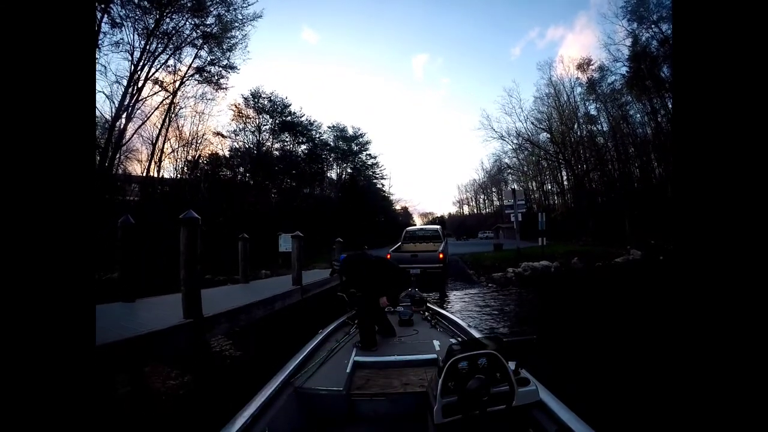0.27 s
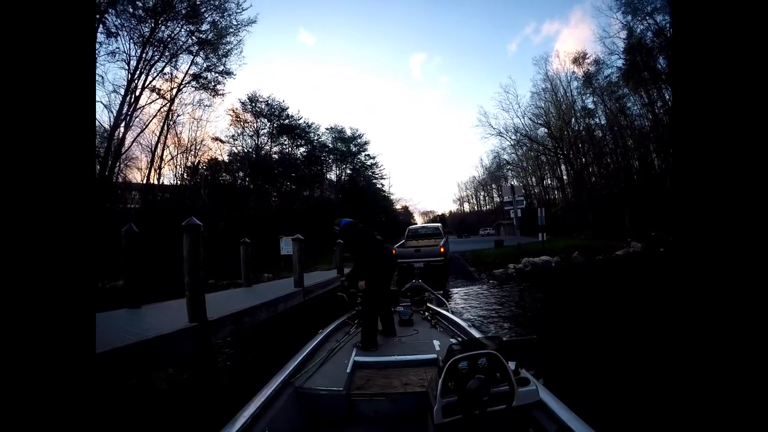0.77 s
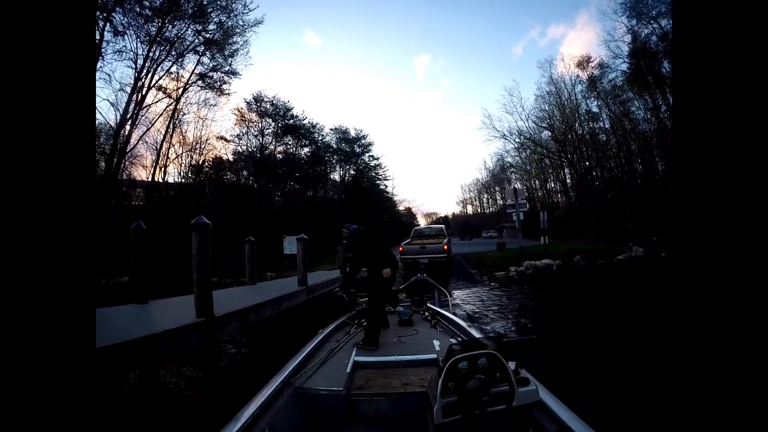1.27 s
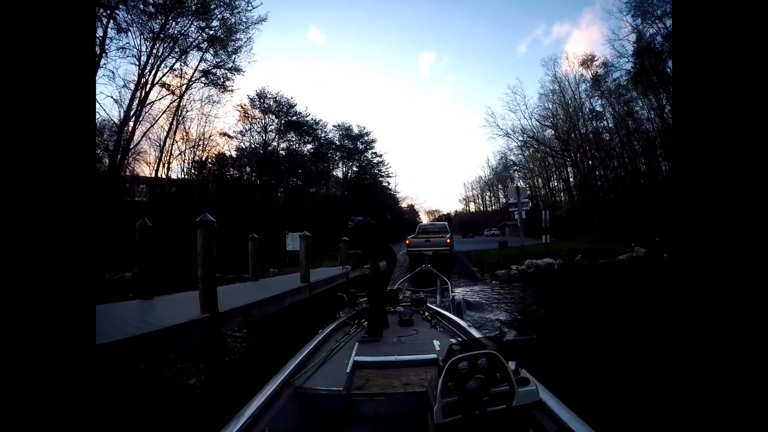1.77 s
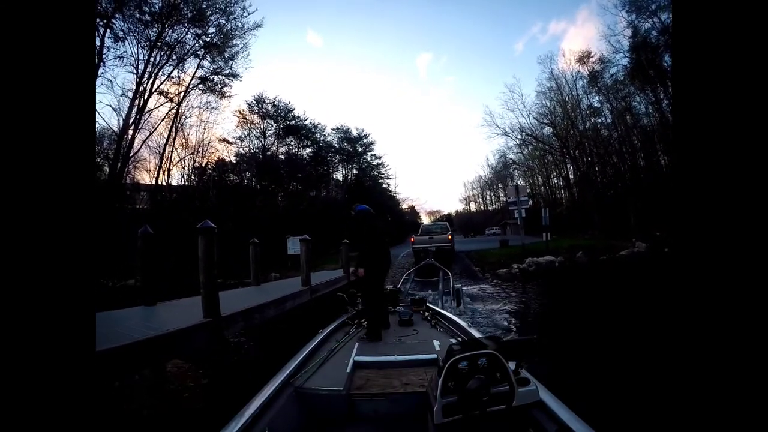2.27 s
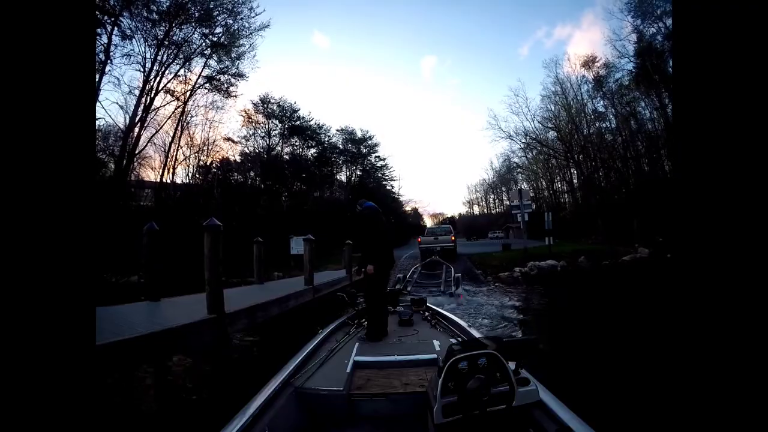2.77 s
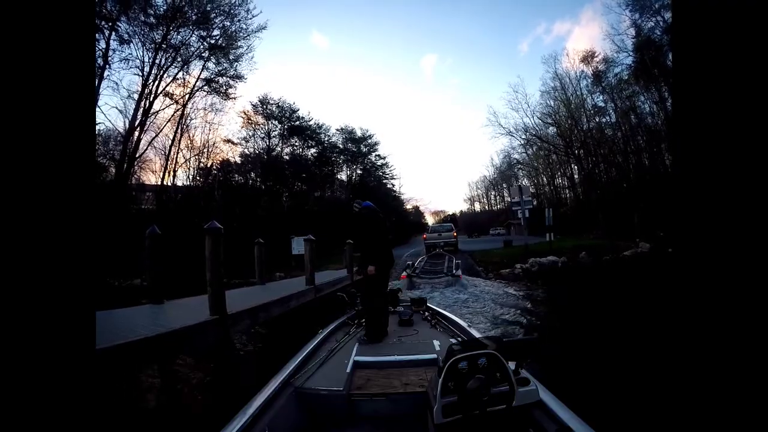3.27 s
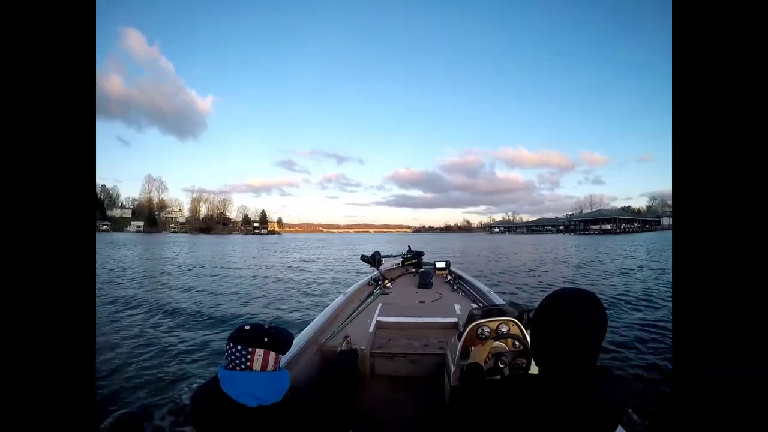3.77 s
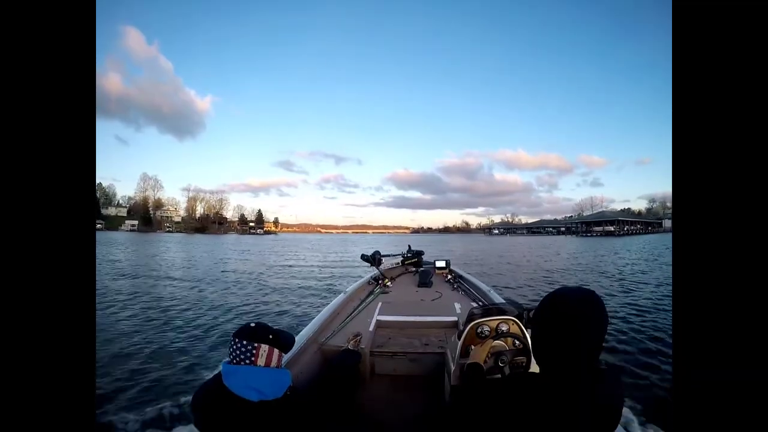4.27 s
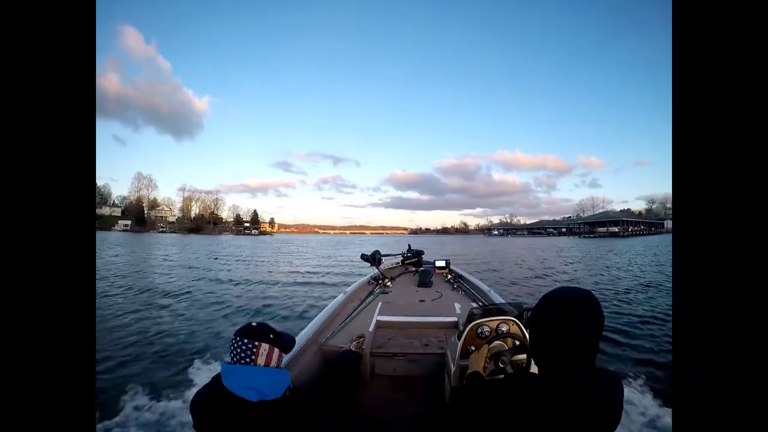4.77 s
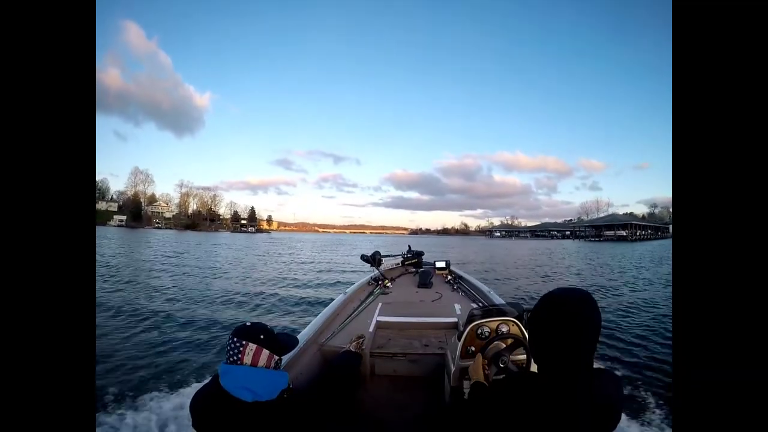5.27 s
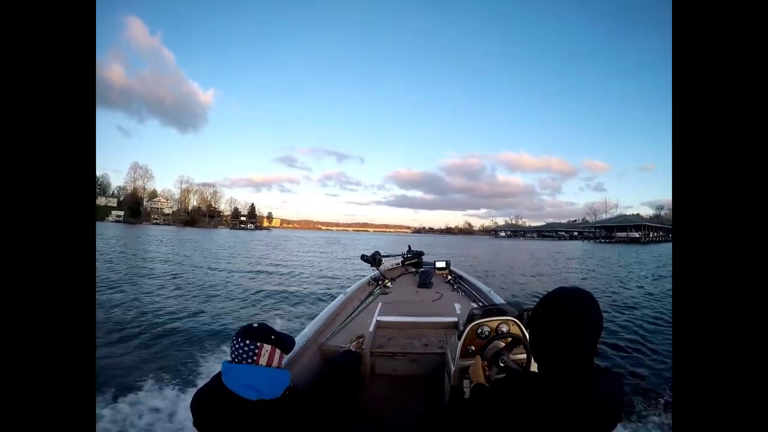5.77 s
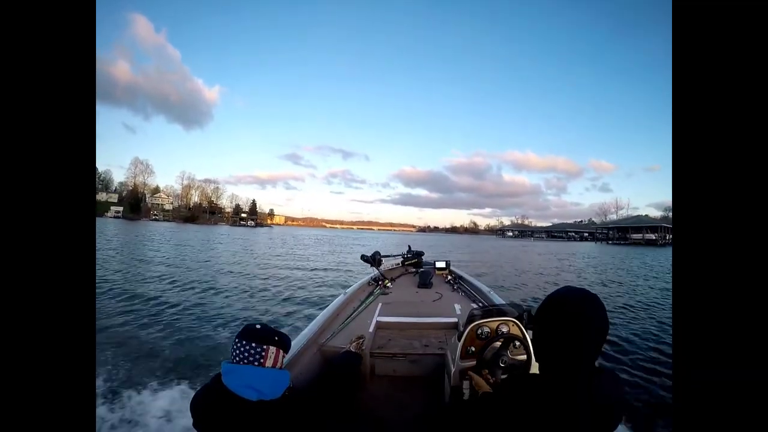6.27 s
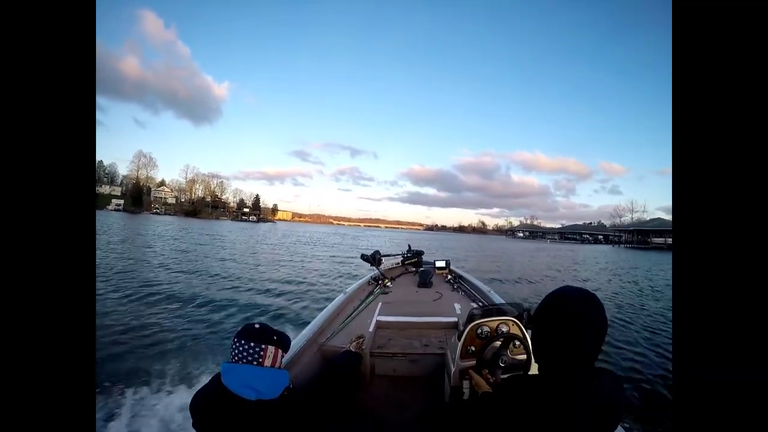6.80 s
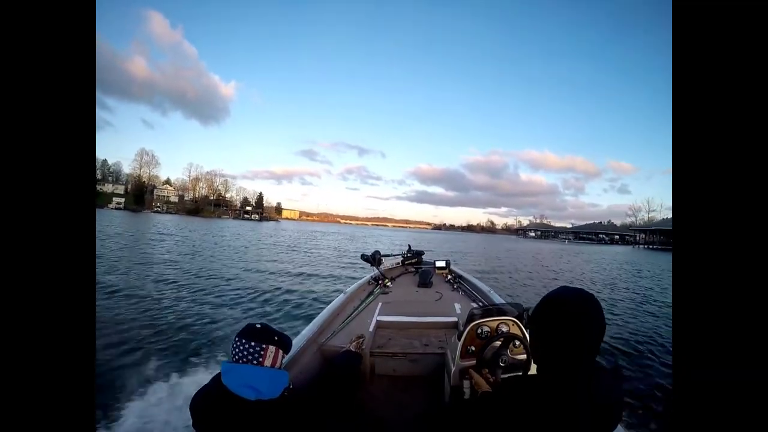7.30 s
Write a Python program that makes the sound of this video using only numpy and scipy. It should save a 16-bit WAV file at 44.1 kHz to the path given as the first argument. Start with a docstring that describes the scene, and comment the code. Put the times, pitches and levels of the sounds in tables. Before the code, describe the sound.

From 0 to 3.35 seconds, an outboard idles at a boat ramp, heard close at the stern: a deep, unsteady rumble with a low throbbing note, churning bubbles and soft fizzing wash spread across the stereo. Small splashes tick at about 1.1 to 1.8 seconds; hollow bubble knocks come around 1.5 to 2 and cluster thickly from 2.6 to 3.2. A quick cross-fade by 3.5 moves to open water, centred. The motor now gives a strong buzzing drone with clattery mid-range rasp, its pitch rising steadily by about a third to the end. It labours around 4 to 5, then smooths; the rasp drops back after about 6 and a softer exhaust chuff enters near 6.7. Spray hisses, water slaps and rushes along the hull, and low wind gusts buffet around 5.2, 6.1, 6.6 and 7.3. Bubble gulps return from 6.8 to 7.4.

```python
"""An outboard motor on a small fishing boat, heard from on board.
At the ramp it idles in gear: shaped noise and a low note make the exhaust rumble, ringing bubbles churn,
and the propeller wash hisses. A quick cross-fade leads to open water, where the motor speeds up:
sine waves tied to the shaft boom through hull resonances, and noise timed by the shaft rasps.
Spray, water slapping the hull and gusts of wind are shaped noise with changing levels."""
import sys
import numpy as np
from scipy import signal
from scipy.fft import rfft, irfft, next_fast_len
from scipy.io import wavfile
from scipy.ndimage import uniform_filter1d, minimum_filter1d, map_coordinates

SR = 44100
rng = np.random.default_rng(int(sys.argv[2]) if len(sys.argv) > 2 else 0)


def dump_mix(stems):
    """Bounce the given channels to the path in sys.argv[1] as a 16-bit WAV at rate SR."""
    frames = np.atleast_2d(stems).T  # one column per channel
    limited = np.clip(frames, -1, 1)  # hard clip at full scale
    pcm = np.round(limited * 32767).astype(np.int16)
    wavfile.write(sys.argv[1], SR, pcm)


N = 332514
TIME = np.arange(N) / SR  # seconds
FADE_START, FADE_END = 3.35, 3.5  # cross-fade from the ramp to open water, seconds
CYLINDERS = 3  # firings per turn of the shaft

# At the ramp the propeller bites, then eases off.
# Each row: time in seconds, churning and wash hiss in dB, both before a fixed trim.
STIRRING = [(0.17, -28.5, -60.5), (0.3, -31, -54.5), (0.5, -31.5, -52.5), (1.2, -26, -45.5),
            (1.85, -25, -47.5), (2.4, -25, -46), (3.0, -20, -49), (3.35, -25, -53.5)]
# Under way. Each row: time in seconds, motor rasp and spray in dB, both before fixed trims.
WORK = [(3.5, -25.5, -37), (3.54, -23.5, -36), (4.03, -25.5, -41.5), (4.79, -22.5, -34.5),
        (5.17, -24.5, -36), (6.44, -34, -42.5), (7.32, -34.5, -41), (7.5, -36, -40.5)]


def amp(db):
    """Turn decibels into a gain."""
    return 10 ** (np.asarray(db) / 20)


def unit(x):
    """Scale to an average strength (rms) of 1."""
    return x / np.sqrt(np.mean(x ** 2) + 1e-20)


def along(points, hz):
    """Read a list of (Hz, value) points at any frequency, on a log axis."""
    f, v = np.transpose(points)
    return np.interp(np.log(hz + 1), np.log(f + 1), v)


def curves(rows):
    """Draw straight lines between timed rows: one curve for each column after the time."""
    s, *cols = np.transpose(rows)
    return [np.interp(TIME, s, c) for c in cols]


def rise(start, end):
    """Rise straight from 0 to 1 between two times, over at least 1 ms."""
    return np.clip((TIME - start) / max(end - start, 1e-3), 0, 1)


def swells(rows):
    """Add up bell-shaped swells, or lulls, in dB from rows of (time, length, gain)."""
    return sum(db * np.exp(-((TIME - s) / length) ** 2) for s, length, db in rows)


def wobble(rate):
    """Draw a smooth random curve through so many random points a second."""
    knots = rng.standard_normal(2048)
    coarse = TIME[::32]
    smooth = map_coordinates(knots, [coarse * rate], mode="wrap")
    return np.interp(TIME, coarse, smooth)


def filtered(x, response):
    """Filter x by a gain that depends on frequency."""
    m = next_fast_len(N + SR // 2)
    return irfft(rfft(x, m) * response(np.fft.rfftfreq(m, 1 / SR)), m)[..., :N]


def coloured(x, spectrum):
    """Shape x by a table of (Hz, dB), then scale it to rms 1."""
    return unit(filtered(x, lambda hz: amp(along(spectrum, hz))))


def resonance(f, hz, width):
    """How one part that rings at hz answers the frequencies f, strength and phase together."""
    return 1j * f * width / (hz * hz - f * f + 1j * f * width)


def rush(patchy_db):
    """Make white noise with patches of random gain in time and frequency."""
    z = signal.stft(rng.standard_normal(N), nperseg=512)[2]
    field = uniform_filter1d(rng.standard_normal(z.shape), size=6, axis=0)
    field = uniform_filter1d(field, size=12, axis=1)
    return unit(signal.istft(z * amp(patchy_db * unit(field)))[1][:N])


def droplets(rate, spread_db):
    """Scatter tiny impacts of uneven size, about rate a second, at rms 1."""
    hits = rng.random(N) < rate / SR
    size = rng.standard_normal(N) * amp(spread_db * rng.uniform(-2.4, 1, N))
    return unit(hits * size)


def bubbles(rate, cycles):
    """Ring a crowd of small bubbles in nine sizes; each swells and fades within a few cycles."""
    out, t = np.zeros(N), np.arange(SR // 10) / SR
    for hz in np.geomspace(140, 800, num=9):
        age = t * hz / cycles
        ring = age * np.exp(-age) * np.sin(2 * np.pi * hz * t)
        crowd = signal.oaconvolve(droplets(rate, spread_db=-1.0), ring)[:N]
        out += np.sqrt(hz) * unit(crowd)
    return unit(out)


def firing(shaft, shaft_hz):
    """Three uneven firings a turn; each multiple booms as the speed carries it through a hull resonance."""
    # Hull resonances. Each row: pitch in Hz, width in Hz, level in dB.
    hull_modes = [(152.7, 24, -30), (169.1, 1.4, -23), (174.8, 10.8, -9), (298.6, 4.7, -9),
                  (305.2, 4.5, -19.5), (339.7, 10.4, -16), (430, 11, -20), (474.9, 12.7, -11),
                  (486, 8.5, -19), (546.2, 18, -22)]
    # The firing rate and its next two multiples: level of each in dB, before the hull boom.
    multiple_db = [0, -1, -12]
    start_db, full_s = -5, 3.85  # softer at first, at full strength from this time
    even_db, end_db, rough_from_s = 0.9, 2.0, 6.3  # rms unevenness: early, at the end, starts to grow
    rough_db = even_db + (end_db - even_db) * rise(rough_from_s, TIME[-1])
    out = np.zeros(N)
    for k, db in enumerate(multiple_db, start=1):
        order = k * CYLINDERS
        boom = np.abs(sum(amp(level) * resonance(order * shaft_hz, hz, width)
                          for hz, width, level in hull_modes))
        flutter = rough_db * unit(k * wobble(60 * k) + wobble(14))
        jitter = .06 * k * wobble(60 * k)
        out += boom * amp(db + flutter) * np.sin(order * shaft + jitter + rng.uniform(0, 2 * np.pi))
    return np.sqrt(2) * amp(start_db * (1 - rise(FADE_END, full_s))) * out


def drone(shaft, shaft_hz):
    """The motor shakes once a turn; unequal cylinders add weaker orders, most while it labours."""
    # Weaker orders, as multiples of the shaft speed.
    orders = [.5, 1.5, 2, 2.5, 3.5, 4, 4.5, 5, 5.5, 6.5, 7, 7.5, 8, 9.5, 10, 10.5, 11, 12, 14, 14.5]
    # One row for each order: dB pulling away, dB labouring, dB running freely, before the transom gain.
    order_levels = [(-31, -21, -32.5), (-26, -24, -36), (-33, -26.5, -30), (-34.5, -31.5, -29),
                    (-27.5, -29.5, -28.5), (-30.5, -29.5, -36.5), (-33, -36.5, -51.5), (-36, -37.5, -40.5),
                    (-30.5, -25, -44), (-43.5, -41.5, -47), (-30.5, -31.5, -32), (-32.5, -41.5, -44),
                    (-40.5, -33, -35), (-38.5, -44.5, -47.5), (-38.5, -31.5, -40), (-38.5, -34.5, -54),
                    (-32, -37.5, -36), (-41, -29, -47), (-32, -30, -41), (-41.5, -38.5, -50)]
    # How the transom passes the weaker orders. Each row: frequency in Hz, gain in dB.
    transom = [(215, 0.5), (250, 3), (272, 1.5), (295, -7.5), (320, 9.5), (334, 3), (350, 4), (375, -3.5),
               (398, 2.5), (417, -9.5), (437, 3), (470, -5.5), (495, 4.5), (522, 5), (548, 0), (580, -9.5),
               (700, -13.5)]
    # Climbing the bow wave, in seconds: begins, full from, full until, over.
    climb_s = [3.65, 4.2, 5.0, 6.1]
    pull = (3.63, 0.15, 3.5)  # hardest as the propeller takes the load: seconds, length in seconds, dB
    shake_db = -16 - 1.0 * (TIME - FADE_END)  # declines by 1 dB a second
    shake_db = shake_db - 10 * rise(6.98, 6.981)  # drops suddenly near the end, still speeding up
    shake_db = shake_db + swells([pull])
    out = amp(shake_db + 0.25 * wobble(15)) * np.sin(shaft + rng.uniform(0, 2 * np.pi))
    free = rise(*climb_s[2:])
    labour = rise(*climb_s[:2]) - free
    for order, (pull_db, labour_db, free_db) in zip(orders, order_levels):
        db = pull_db * (1 - labour - free) + labour_db * labour + free_db * free
        db = db + along(transom, order * shaft_hz) + 2.2 * wobble(8)
        stray = .28 * wobble(10) + .15 * wobble(45)  # the phase wanders, in radians
        out += amp(db) * np.sin(order * shaft + stray + rng.uniform(0, 2 * np.pi))
    return np.sqrt(2) * out


def clatter(shaft):
    """Valve clatter: random patterns that repeat loosely every two turns, in a shifting mix."""
    play = .04 * wobble(40)
    cycle = (shaft + play) / (4 * np.pi) % 1
    patterns = rng.standard_normal((3, 1024))
    valves = sum(wobble(9) * np.interp(cycle, np.linspace(0, 1, len(p)), p) for p in patterns)
    strength = np.sqrt(np.abs(uniform_filter1d(valves ** 2, size=1024)) + 1e-6)
    return valves / strength  # evens out the loudness


def rasp(shaft):
    """Valve clatter and gritty intake roar ring the cowling, pulsing with the turns of the shaft."""
    # Colour of the roar. Each row: frequency in Hz, relative level in dB.
    roar_colour = [(600, -33), (860, -9), (1030, -2), (1350, -3), (1650, -2.5), (1930, -8), (2150, -3.5),
                   (2500, -9.5), (2800, -20.5), (3300, -16), (4500, -51)]
    # Cowling resonances. Each row: pitch in Hz, width in Hz, relative level in dB.
    cowling = [(1045, 44, -5.5), (1224, 29, -6.5), (1404, 21, -10), (1474, 70, -1.5), (1633, 180, -9.5),
               (1823, 60, -6.5), (2507, 100, -5.5)]
    # The uneven lope fades: begins to ease, has eased, in seconds.
    lope_s = [3.9, 4.8]
    clatter_share = .42  # share of the power; the rest is intake roar
    rasp_db, _ = curves(WORK)
    lope = .17 + (.04 - .17) * rise(*lope_s)
    pulsing = 1 + lope * np.cos(shaft / 2 + .5 * wobble(14))  # once in two turns
    pulsing = pulsing + 0.1 * np.cos(shaft) + .06 * np.cos(CYLINDERS * shaft)
    pulsing = pulsing * amp(0.7 * wobble(260))
    valves = clatter(shaft)

    def source():
        """Mix the same clatter with fresh roar."""
        intake = rush(patchy_db=0.5)
        return pulsing * (np.sqrt(clatter_share) * valves + np.sqrt(1 - clatter_share) * intake)

    roar, drive = coloured(source(), roar_colour), coloured(source(), roar_colour)
    ring = np.zeros(N)
    for hz, width, db in cowling:  # each resonance flutters on its own
        panel = filtered(drive, lambda f: resonance(f, hz, width))
        ring += amp(db + 1.6 * wobble(14)) * panel
    return amp(rasp_db - 4.0) * roar + amp(rasp_db - 6.5) * unit(ring)


def chuff(shaft):
    """As the stern lifts at speed, the exhaust puffs once a turn."""
    # Colour of the puffs. Each row: frequency in Hz, relative level in dB.
    puff_colour = [(260, -23.5), (380, 7.5), (570, 3.5), (720, -3), (1100, -41.5), (3000, -120)]
    # The chuff begins, is full from, in seconds.
    puff_s = [6.63, 6.9]
    puffs = (1 + np.cos(shaft)) ** 4 * rng.standard_normal(N)
    return amp(-33) * rise(*puff_s) * coloured(puffs, puff_colour)


def idling():
    """The slow exhaust beats under water and boils up in bubbles."""
    # Each row: time in seconds, exhaust note in Hz before its random wander.
    idle_note = [(0, 92.3), (0.5, 88.1), (1.0, 86.3), (1.5, 83.5), (2.1, 89.9), (2.4, 80.03), (2.8, 74.14),
                 (3.4, 81.4)]
    # The exhaust boils up. Each row: time in seconds, length in seconds, churning gain in dB.
    surges = [(0.09, 0.1, 3), (1.62, 0.12, 3), (1.97, 0.12, 2.5), (2.4, 0.16, 4.5), (2.82, 0.062, 3.5),
              (2.93, 0.037, 0), (3.1, 0.14, 1.5)]
    # Colours of the rumble and the churning. Each row: frequency in Hz, relative level in dB.
    rumble_colour, churn_colour = [(7.1, -39.5), (12, 8.5), (32, 8.5), (59, 0.5), (92, 0.5), (140, -7),
                                   (168, -16.5), (201, -10), (260, -20), (340, -40), (570, -120)], [(90, -16.5), (135, 0), (175, -1.5), (215, -6.5),
                                                   (330, -8.5), (440, -13), (555, -13.5), (680, -23.5),
                                                   (850, -35.5), (1300, -61)]
    churn_db, _ = curves(STIRRING)
    surge_db = swells(surges)
    note_hz, = curves(idle_note)
    rumble = coloured(rng.standard_normal(N), rumble_colour)
    # the recorder's bass levelling evens out the rumble
    strength = np.sqrt(np.abs(uniform_filter1d(rumble ** 2, size=1300))) + 0.03
    rumble = unit(rumble / strength ** .8)
    phase = 2 * np.pi * np.cumsum(note_hz) / SR + 1.4 * wobble(16)
    note = amp(-9.5 + 4.0 * wobble(22.85)) * np.sin(phase)
    churn = coloured(bubbles(rate=240, cycles=0.57) + 3 * rng.standard_normal(N), churn_colour)
    exhaust = amp(-13 + .3 * surge_db) * (rumble + note)  # surges lift it less than the churning
    return exhaust + amp(churn_db + surge_db + 2.0) * churn


def gulps():
    """A big bubble swells, knocks and sweeps up in pitch as it surfaces; echoes off hull and water blur it."""
    # Big exhaust bubbles. Each row: time of the peak in seconds, level in dB, pitch at the peak in Hz,
    # life in seconds, gurgle level in dB.
    big_bubbles = [(0.124, -25, 603, 0.004, -26.5), (0.387, -26.5, 321, 0.0047, -32),
                   (0.689, -35, 513, 0.0037, -29), (1.513, -22, 318, 0.003, -27),
                   (1.598, -26, 250, 0.0041, -28), (1.71, -20.5, 259, 0.0051, -28),
                   (1.829, -36, 435, 0.0041, -34), (1.954, -12, 251, 0.0058, -28.5),
                   (2.573, -16, 277, 0.0034, -30), (2.644, -17.5, 474, 0.0047, -20),
                   (2.731, -23, 380, .003, -28), (2.754, -15, 285, 0.0037, -25),
                   (2.76, -25, 680, 0.0042, -25.5), (2.787, -21, 508, 0.0036, -24),
                   (2.808, -34, 810, 0.0037, -21), (2.829, -10, 417, 0.0031, -19),
                   (2.84, -22.5, 693, 0.0044, -27), (2.882, -24, 713, 0.0033, -26),
                   (2.945, -21, 481, 0.004, -20.5), (3.003, -18, 315, 0.0063, -19),
                   (3.015, -19, 450, 0.0044, -24), (3.07, -17, 257, 0.0029, -25),
                   (3.11, -25, 400, .005, -20), (3.13, -30, 1155, 0.0022, -29),
                   (3.193, -28, 513, 0.0047, -27), (6.84, -17.5, 472, 0.0032, -35),
                   (6.989, -23.5, 420, 0.0063, -27), (7.202, -18, 496, .004, -24.5),
                   (7.238, -21, 556, 0.0021, -33), (7.365, -22, 415, .004, -15.5)]
    # Colour of the gurgle. Each row: frequency in Hz, relative level in dB.
    gurgle_colour = [(90, -43), (220, 4.5), (600, 1.5), (800, -18), (1100, -26), (2500, -71), (5000, -120)]
    glide_s = 0.0127  # time in which the pitch rises by the factor e (2.718)
    out, gurgle = np.zeros(N), np.zeros(N)
    for s, db, hz, life, gurgle_db in big_bubbles:
        near = np.abs(TIME - s) < 6 * life
        age = (TIME[near] - s) / life  # in bubble lives, negative before the peak
        pitch = hz * np.exp(age * life / glide_s)
        out[near] += amp(db) * np.exp(-age ** 2 / 2) * np.sin(2 * np.pi * np.cumsum(pitch) / SR)
        spread = np.where(age < 0, 1, 2)  # the gurgle falls more slowly than it rises
        gurgle[near] += amp(gurgle_db) * np.exp(-(age / spread) ** 2 / 2)
    out = out * (1 + .3 * wobble(350))  # unsteady in level
    t = np.arange(SR // 20) / SR
    echoes = rng.standard_normal(len(t)) * amp(-60 * t / 0.13)
    blur = amp(-10.5) * signal.oaconvolve(out, echoes / np.linalg.norm(echoes))[:N]
    return out + blur + gurgle * coloured(rng.standard_normal(N), gurgle_colour)


def wash():
    """Stirred water fizzes along the stern, with an odd splash."""
    # Colour of the hiss. Each row: frequency in Hz, relative level in dB.
    hiss_colour = [(470, -32), (800, -0.5), (912, -3), (984, -3.5), (1470, -9.5), (2180, -12.5),
                   (2430, -11.5), (3400, -14.5), (4000, -15), (4970, -22), (6320, -16.5), (7200, -21),
                   (8290, -26.5), (10800, -36.5), (14000, -63.5), (22000, -120)]
    # Small splashes. Each row: time in seconds, peak in dB before a fixed trim.
    small_splashes = [(0.6055, -36.5), (1.14, -24.5), (1.3614, -25.5), (1.5676, -22), (1.827, -22.5),
                      (3.2471, -24.5)]
    _, hiss_db = curves(STIRRING)
    fizz = coloured(rush(patchy_db=1.5) + 0.49 * droplets(rate=2500, spread_db=11.0), hiss_colour)
    # each splash starts at once and dies away by 60 dB in 0.12 s
    splashes = sum(amp(db - 60 * np.abs(TIME - s) / 0.12) * (TIME > s) for s, db in small_splashes)
    splash_noise = coloured(rng.standard_normal(N), hiss_colour)
    return amp(hiss_db + 3.5) * fizz + amp(-16.0) * splashes * splash_noise


def stern():
    """Water churns all round the stern, so left and right differ, most in the treble."""
    # Stereo width. Each row: frequency in Hz, gain of the left-right difference in dB.
    side_gain = [(60, -16), (200, -11.5), (600, -8), (1100, -1.5), (3300, -10), (6000, -4), (10000, 2.5),
                 (13000, -4)]
    mid = idling() + wash()
    side = filtered(idling() + wash(), lambda hz: amp(along(side_gain, hz)))
    return np.array([mid + side, mid - side])


def water():
    """The hull pushes through the chop and throws spray: three layers of patchy, shaped noise."""
    # Swells and lulls in the waves slapping the hull.
    # Each row: time in seconds, length in seconds, gain in dB.
    waves = [(3.55, 0.22, 14), (3.95, 0.18, 0), (4.7, 0.17, -7), (5.7, 0.55, 1), (6.12, 0.081, 10),
             (6.85, 0.12, -11), (7.28, 0.13, 8)]
    # Colours of slap, flow and spray. Each row: frequency in Hz, relative level in dB.
    slap_colour, flow_colour, spray_colour = [(120, -32), (220, -4), (320, 2.5), (400, -4), (520, -10),
                                              (620, -29.5), (900, -72.5)], [(200, -9.5), (450, -0.5), (560, -6), (640, -10),
                                                            (780, -7), (860, -14.5), (1200, -7),
                                                            (2500, -68.5)], [(1590, -25), (2700, -1),
                                                                          (3270, -8.5), (3980, -1.5),
                                                                          (4820, -7.5), (6540, -3.5),
                                                                          (7560, -14), (9370, -17),
                                                                          (10000, -22), (10800, -33.5),
                                                                          (14000, -74), (22000, -120)]
    rasp_db, spray_db = curves(WORK)
    wave_db = swells(waves)
    slap_db = -33.5 + wave_db + 0.91 * wobble(21)  # ripples against the bow, swelling and lulling
    slap = amp(slap_db) * coloured(rush(patchy_db=4.5), slap_colour)
    way_db = -3.5 * (1 - rise(FADE_END, 4.5))  # weaker until the boat has gathered way
    # the flow along the hull follows the motor rasp closely and the waves a little
    flow_db = -6.5 + way_db + 0.85 * rasp_db + 0.11 * wave_db + wobble(9.7)
    flow = amp(flow_db) * coloured(rush(patchy_db=2.0), flow_colour)
    drops = .4 * droplets(rate=3000, spread_db=6)
    spray = amp(spray_db + 0.74) * coloured(rush(patchy_db=1.16) + drops, spray_colour)
    return slap + flow + spray


def wind():
    """The head wind buffets the microphone in gusts of low noise."""
    # Each row: time in seconds, length in seconds, gain in dB.
    gusts = [(3.58, 0.25, 5), (5.2, 0.12, 8.5), (6.13, 0.06, 8), (6.6, 0.28, 6.5), (6.98, .045, 7),
             (7.12, .03, 5), (7.31, 0.08, 9.5)]
    # Colour of the wind. Each row: frequency in Hz, relative level in dB.
    wind_colour = [(10, -6), (25, 7), (55, 3.5), (100, -1), (150, -2.5), (220, -8), (300, -32.5),
                   (600, -79.5)]
    flutter_db = 1.8 * wobble(8)
    return amp(-22 + swells(gusts) + flutter_db) * coloured(rng.standard_normal(N), wind_colour)


def scene():
    """The ramp fades into the run across open water, with big bubbles in both."""
    # Under way the throttle opens steadily. Each row: time in seconds, crankshaft turns a second.
    speed = [(3.45, 46.1), (3.62, 47.48), (3.8, 48.15), (3.92, 49.73), (4.3, 51.73), (4.64, 52.95),
             (4.95, 54.67), (5.25, 54.86), (5.62, 56.94), (6.06, 57.75), (6.27, 59.22), (6.44, 59.92),
             (6.7, 60.2), (7.07, 61.97), (7.5, 62.78)]
    shaft_hz, = curves(speed)
    shaft = 2 * np.pi * np.cumsum(shaft_hz) / SR  # angle of the shaft in radians
    fade = rise(FADE_START, FADE_END)
    motor = firing(shaft, shaft_hz) + drone(shaft, shaft_hz) + rasp(shaft) + chuff(shaft)
    under_way = motor + water() + wind()  # the same in both channels
    return np.sqrt(1 - fade ** 2) * stern() + fade ** 1.5 * under_way + gulps()


def record(dry):
    """Turn the highest peaks down in both channels, cut all above 13 kHz and thin out the deepest bass."""
    needed = np.minimum(1, .9 / (np.abs(dry).max(axis=0) + 1e-9))
    gain = uniform_filter1d(minimum_filter1d(needed, size=500), size=500)
    return filtered(dry * gain, lambda hz: (hz < 13000) * hz / np.hypot(hz, 6))


dry = scene()
out = record(dry)
dump_mix(out)
```